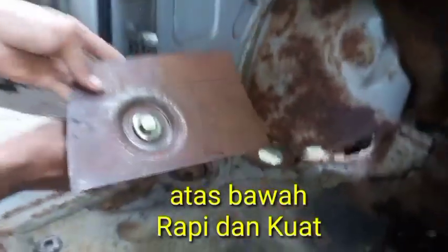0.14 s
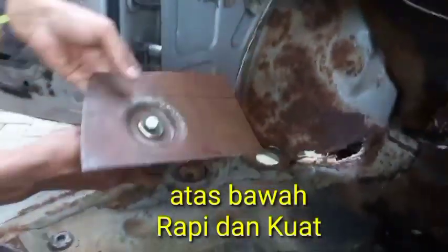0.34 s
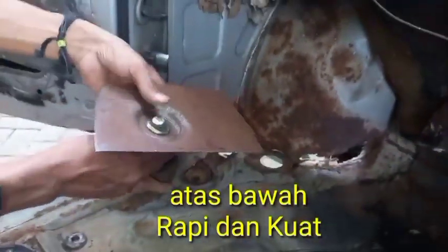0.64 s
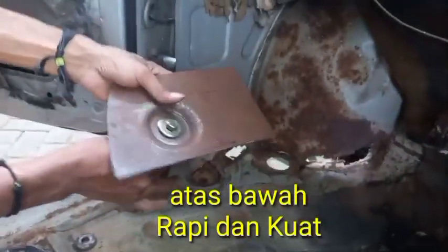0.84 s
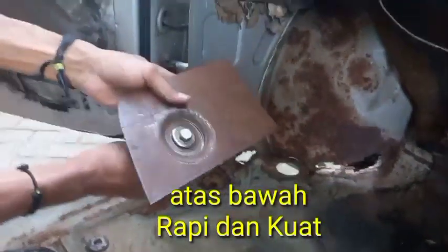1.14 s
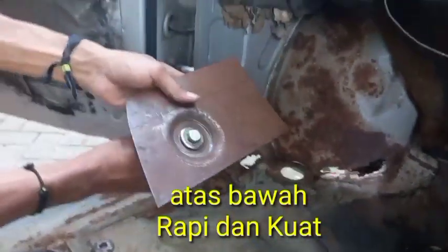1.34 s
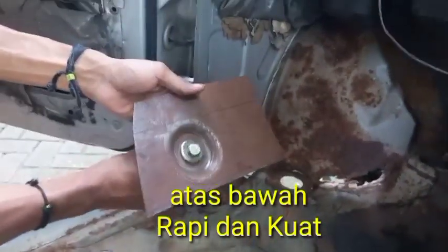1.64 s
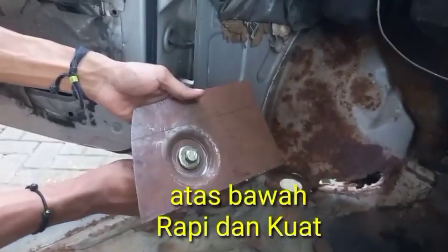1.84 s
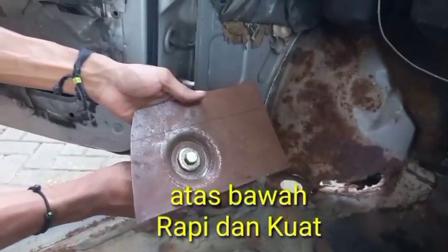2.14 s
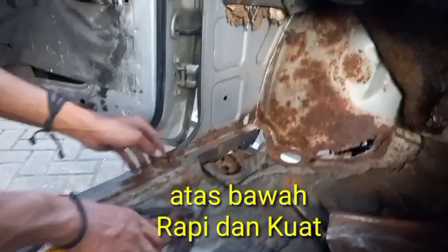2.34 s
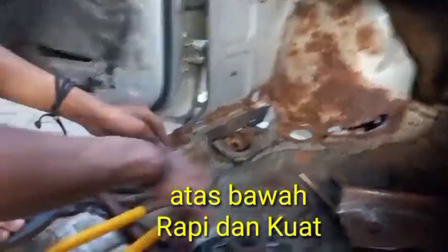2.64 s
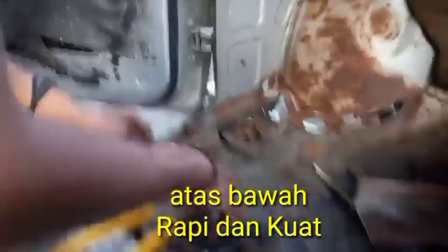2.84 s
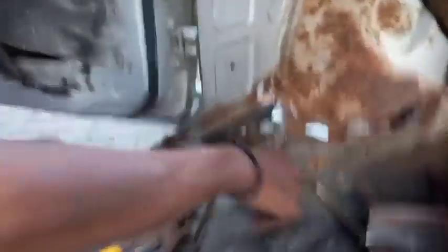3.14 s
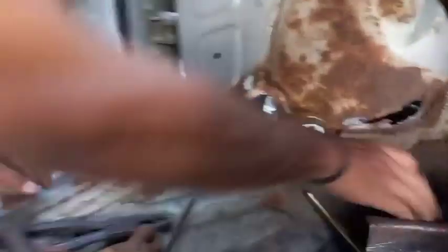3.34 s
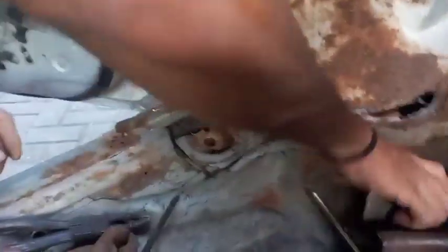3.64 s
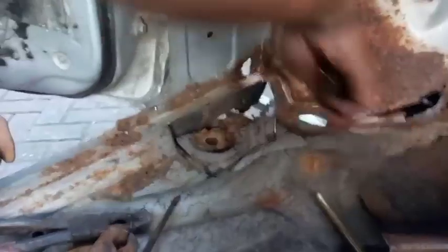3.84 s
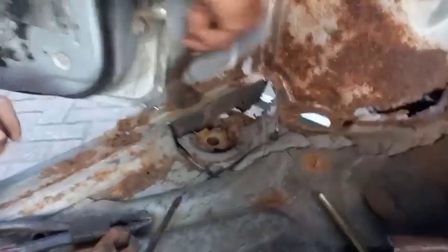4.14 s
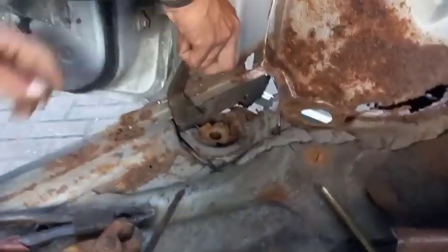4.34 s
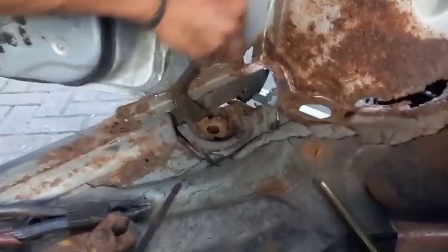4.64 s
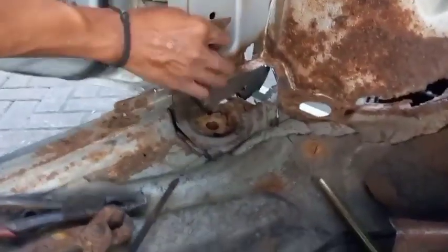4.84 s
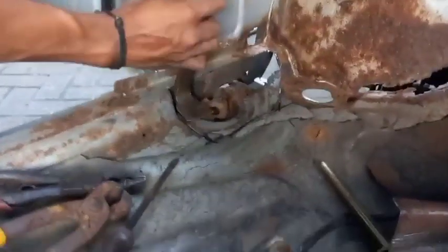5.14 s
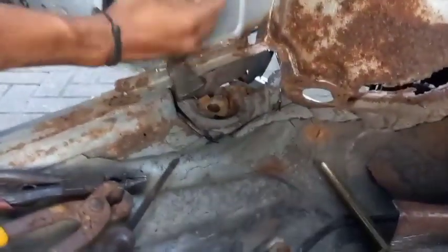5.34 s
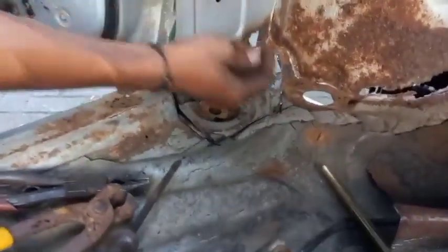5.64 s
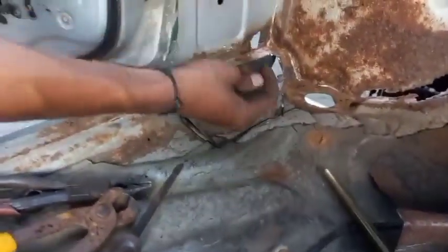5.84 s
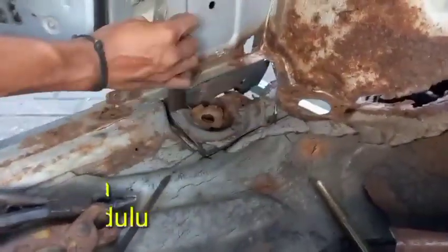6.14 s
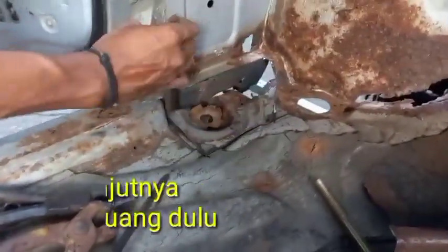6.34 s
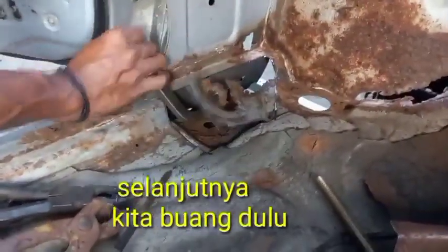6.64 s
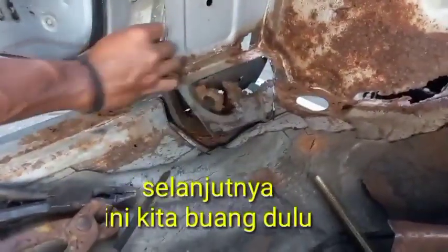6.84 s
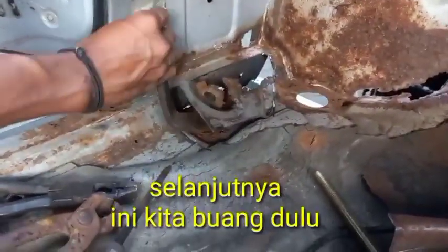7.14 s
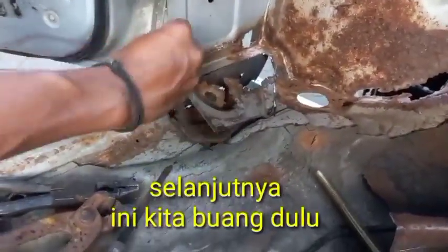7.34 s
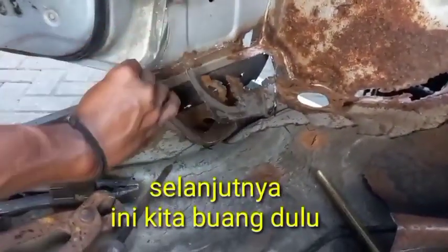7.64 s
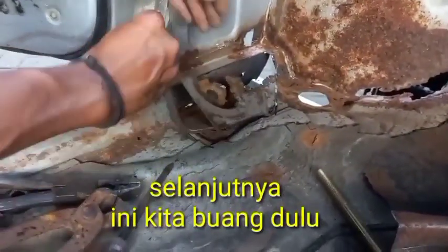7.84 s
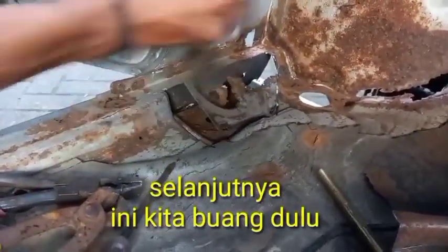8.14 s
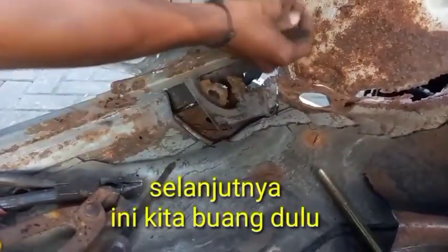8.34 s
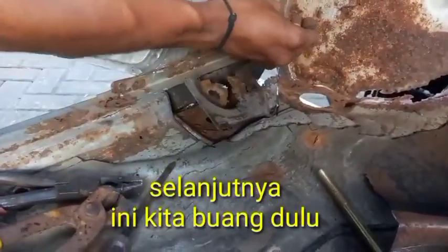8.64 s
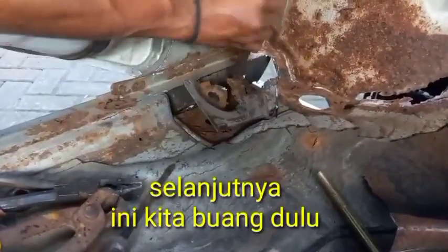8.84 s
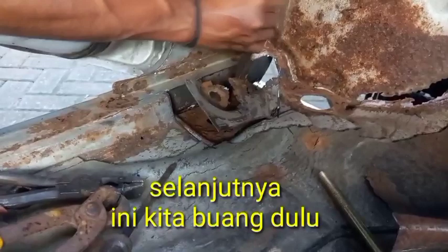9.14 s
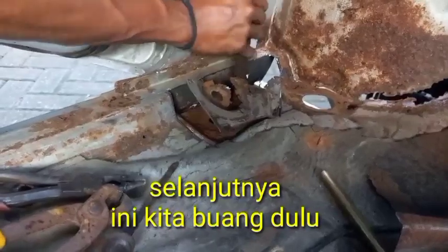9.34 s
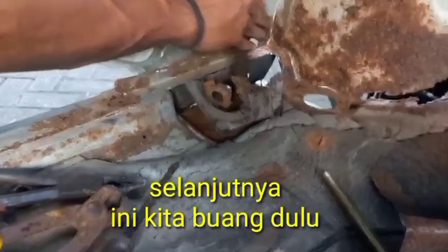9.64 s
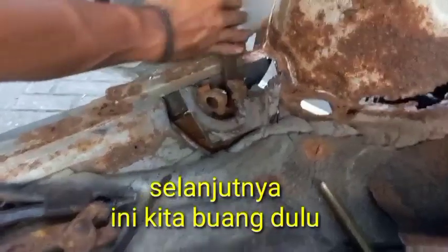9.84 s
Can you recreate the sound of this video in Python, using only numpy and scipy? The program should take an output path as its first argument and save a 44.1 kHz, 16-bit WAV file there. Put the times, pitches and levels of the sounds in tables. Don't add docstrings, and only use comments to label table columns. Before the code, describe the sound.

A steel tool knocks, scrapes and pries at a rusted car floor in irregular hollow clanks, after faint finger taps on a small metal plate.

```python
import sys
import numpy as np
from scipy import signal
from scipy.fft import rfft, irfft, next_fast_len
from scipy.io import wavfile
from scipy.ndimage import uniform_filter1d, map_coordinates

SR = 44100
rng = np.random.default_rng(int(sys.argv[2]) if len(sys.argv) > 2 else 0)


def generate_wav(signal):
    frames = np.transpose(np.atleast_2d(signal))
    scaled = np.clip(frames, -1, 1) * 32767
    pcm = np.round(scaled).astype(np.int16)
    wavfile.write(sys.argv[1], SR, pcm)


def level_to_linear(level):
    exponent = np.asarray(level, float) / 20
    return 10 ** exponent


N = 441000

# (time [s], rumble level [dB])
TRAFFIC = [
    (0, -68),
    (.45, -74),
    (1.1, -71.5),
    (1.6, -70.5),
    (2.39, -71.5),
    (2.49, -63),
    (5.3, -65.5),
    (7.2, -64),
    (8.4, -68),
    (10, -59.5),
]
# (frequency [Hz], density [dB per Hz])
RUMBLE_SPECTRUM = [(12, -69.5), (32, -29), (51, -7.5), (76, -3.5), (100, -3), (130, -18), (200, -26),
                   (440, -120)]
# (frequency [Hz], density [dB per Hz])
DRONE_SPECTRUM = [(76, -30.5), (130, -9), (260, -2), (380, -5), (560, -11), (900, -14.5), (2500, -34.5),
                  (3300, -79.5), (5500, -120)]
DRONE_DB, DRONE_SHARE = -81.5, 0.26
SHUDDER_DB, SHUDDER_S, SHUDDER_DRONE_DB = -11, 0.17, -20
# (frequency [Hz], density [dB per Hz])
HISS_SPECTRUM = [(710, -40), (1200, -6), (2000, -8), (6500, -11), (7800, -3), (9200, -10), (14500, -9),
                 (16000, -17)]
HISS_DB = -91

# (start [s], length [s],
# frequency [Hz], level [dB])
SINGING_MODES = [(0, 0.2, 535, -71), (0, 0.09, 1070, -87), (.89, 0.088, 94, -63.5),
                 (1.107, 0.14, 101.5, -59), (5.31, 0.12, 226, -66), (5.308, 0.12, 457, -71),
                 (1.463, 0.23, 7750, -84), (1.553, 1, 550, -91), (2.528, 0.21, 68, -46),
                 (2.662, 0.3, 68, -55), (2.6, 0.087, 2680, -88), (2.728, .058, 2660, -83),
                 (3.25, 0.2, 3440, -80), (7.046, 0.05, 3500, -80), (7.459, 0.094, 225, -37.5),
                 (7.66, 0.23, 1480, -80), (8.227, 0.16, 1457, -80), (8.296, 0.19, 2690, -84.5),
                 (8.284, 0.18, 1116, -88), (8.621, .2, 231, -31), (9.19, 0.13, 1490, -66),
                 (9.401, 0.098, 1450, -74), (8.835, .045, 1470, -63), (7.95, .15, 1480, -80),
                 (8.9, 0.053, 1950, -58), (6.05, .07, 990, -60), (9.656, 0.061, 1400, -68),
                 (9.911, .03, 700, -25), (5.83, .025, 1200, -33), (4.705, .06, 750, -56),
                 (4.585, .03, 1250, -72), (8.461, .04, 760, -29), (5.13, .07, 640, -55)]
MODE_WIDTH_HZ, MODE_LOSS = 5.8, 0.013
# (start [s], length [s], frequency [Hz], width [Hz], level [dB])
BRUSHES = [
    (0, .12, 563, 334, -70.5),
    (0.518, 0.14, 7140, 2510, -83),
    (1.505, 0.16, 10200, 7900, -82),
    (3.021, 0.18, 2670, 282, -88.5),
    (3.223, 0.23, 1340, 122, -81),
    (4.849, 0.39, 1420, 152, -80),
]

# (time [s], peak level [dB], low level [dB], click level [dB])
FINGER_TAPS = [(.248, -73, -2, 2), (.719, -69.5, -10, -12), (.803, -56, -10, -25), (.825, -52, -11, -24),
               (.843, -46, -28, -30), (.873, -44, -23, -32), (.901, -51.5, -25, -18),
               (1.02, -60, -1.5, -25), (1.079, -48, -12, -13), (1.109, -55.5, -10, -18),
               (1.159, -64, -22, 12.5), (1.17, -72, -5, 4), (1.095, -58, -10, -12), (1.328, -73, -11, -18),
               (1.389, -69, -9, -15), (1.483, -59, -29, -25)]
# (frequency [Hz], width [Hz], level [dB])
PLATE_MODES = [(868, 54, -2.5), (1240, 73, -2.5), (1780, 130, -6), (2490, 35, -16), (2480, 17, -11)]
RUB_T60 = 0.08

# (time [s], lag of the left port [samples])
PORT_LAG = [(0, -5), (2.2, -5), (2.7, -14), (3.1, 9), (4.4, 10), (4.7, -5), (5.2, -9), (6.2, -6), (6.7, 20),
            (7.1, -5), (8.3, -4), (8.7, 15), (9.1, -4), (10, -6)]
# (time [s], left over right [dB])
PORT_BALANCE = [(2.49, 1), (3.03, 0), (3.7, -2.5), (4.16, -1), (4.54, -2.5), (5.33, -1), (5.83, -2.5),
                (6.15, -0.5), (6.7, -2), (7.3, 0.5), (7.9, -1.5), (8.46, -4), (8.62, -1), (9.5, -1),
                (10, -3)]
# (start [s], end [s])
SILENCE = (2.388, 2.487)

# (frequency [Hz], width [Hz], level [dB])
BOOM_MODES = [(68, 7.6, -15), (117, 9.8, -11.5), (155, 17, -5.5), (204.2, 20.6, -2.5), (231, 13.6, 0),
              (280.3, 27, -4.5)]
# (frequency [Hz], width [Hz], level [dB])
PANEL_MODES = [(347, 41.6, 1), (401.4, 34.7, 2), (467.3, 45.3, 3), (542.4, 43.8, 0), (642, 41, -4),
               (684, 60, -3), (817.5, 85, -6.5), (978.6, 62.4, -5), (1187, 130, -11)]
# (frequency [Hz], width [Hz], level [dB])
CLANK_MODES = [(1388, 162, 4), (1503, 84, 3.5), (1596, 75, 0), (1806, 110, 0), (1962, 210, -2.5),
               (2415, 45, -3), (2402, 92, -9), (2820, 200, -13.5), (2850, 90, -14), (3870, 470, -25.5)]
# (frequency [Hz], width [Hz], level [dB])
THUD_MODES = [(222, 114, -4), (399, 241, 0.5), (720, 352, -6.5)]
# (frequency [Hz], density [dB per Hz])
GRIT_SPECTRUM = [(1470, -28), (2500, -8.5), (4730, -7), (6650, -10), (8080, -6.5), (10400, -10),
                 (14800, -11.5), (15900, -50)]

# (time [s], peak level [dB], boom level [dB], grit level [dB], bright level [dB])
PRESSED_BLOWS = [(2.534, -19, -14, -20, -1.5), (2.548, -16, -12, -41, -2),
                 (2.707, -22.5, -8.5, -40.5, -2.5), (2.865, -40, -11, -42.5, 4),
                 (2.885, -37, -26.5, -28.5, 3.5), (3.568, -48.5, 3, -21, -0.5),
                 (5.131, -40, -27, -13, -0.5), (6.454, -36, -13.5, -20.5, 1), (8.968, -32.5, 2, -20, -2.5),
                 (3.711, -26, -27, -15, -3.5), (3.747, -33, -2.5, -39, -8), (4.229, -23.5, -11.5, -50, -5),
                 (4.261, -23.5, -12, -45, -2.5), (4.361, -18, -9, -23.5, -1),
                 (4.749, -42.5, -37, -6.5, 0.5), (5.29, -56, -12, -20, 1.5), (5.422, -19.5, -14, -55, -6),
                 (5.832, -19, -20, -33, 11), (6.126, -23.5, -10.5, -6, 5), (6.653, -28, 2, -9, -1.5),
                 (6.704, -22, -20, -20, 1), (6.735, -26.5, -9.5, -11, -1), (6.875, -16.5, -13.5, -30, 1),
                 (7.331, -23, -4, -36, -3), (7.484, -20, -8, -21, 0.5), (7.642, -36, -2.5, -42, -3),
                 (7.873, -29, -11, -24, 6), (8.548, -29, -16.5, -3, -2.5), (9.742, -42, 2, -30, -3),
                 (9.913, -9, -11, -20, 0), (5.952, -37.5, -14.5, -25, -1), (6.629, -33.5, -9.5, -9.5, 1.5),
                 (6.857, -37, -12, -15, 5), (8.889, -33, -3.5, -14, 0.5), (8.907, -30.5, -7, -14, 5),
                 (9.9, -28, -2, -40, -5), (9.358, -46, -4, -14.5, 0), (8.629, -18, -10.5, -34, 0.5),
                 (8.502, -20.5, -18.5, -31, -3)]
# (time [s], peak level [dB], boom level [dB], grit level [dB], bright level [dB])
FREE_BLOWS = [(2.506, -41.5, -2, -39.5, -2.5), (2.69, -46, -8, -39.5, 5), (3.23, -49.5, -6.5, -58, -5.5),
              (3.465, -39, -11.5, -13, 4.5), (3.625, -36.5, -1, -31, -0.5), (3.693, -18, -10, -35, -8),
              (4.318, -29, -4, -38, -1.5), (4.634, -41, -10, -45, -5), (4.71, -45, -40, -22, 6),
              (4.891, -50, -12, -45, -6), (5.003, -38, -35, -7, 1.5), (5.628, -46, -2, -30, -3),
              (5.708, -43.5, -16.5, -13.5, 2.5), (5.789, -33, -29.5, -18.5, 3.5), (5.824, -24, -27, -28, 4),
              (5.97, -27, -15, -27, 6), (6.548, -27, -10, -32, -1.5), (6.591, -26, -7.5, -14, -3),
              (6.819, -35, -4.5, -30, 0), (7.036, -63, 10, -5, 0), (7.453, -21, -6.5, -9, 1),
              (8.462, -8, -30.5, -23.5, -1.5), (8.621, -19, -9.5, -9.5, -3.5), (8.829, -31, -7.5, -15.5, 3),
              (9.242, -48.5, 8.5, -21.5, -3.5), (9.549, -73, 16, -31.5, -6), (9.887, -32.5, 1, -31.5, -1)]
PRESSED_T60, FREE_T60 = 0.22, 0.39
BLOW_CLANK_DB, BLOW_CLANK_SHARE = -8, 0.24
BRIGHT_CLANK_SHARE = 0.7
THUD_DB, REBOUND_S, REBOUND_DB = 13, 0.004996, -4.5
GRIND_LEAD, GRIND_S, GRIND_DB, GRIND_GRIT_DB = 0.0068, 0.024, -18.5, 4.5

# (start [s], length [s], panel level [dB], grit level [dB], bright level [dB])
EDGE_DRAGS = [(2.852, 0.095, -62.5, -3, 0), (3.225, .08, -66, -25, 0), (5.285, .07, -62, -14, 0),
              (5.14, .06, -50, -15, 3), (7.99, .12, -60, -22, -1.5), (3.43, 0.11, -57.5, -5.5, -0.5),
              (3.528, 0.11, -59, -19, -1), (3.639, 0.04, -46, -12.5, 1), (3.765, 0.14, -62.5, -12, -7.5),
              (3.886, .16, -59.5, -12, 1.5), (4.226, 0.19, -46, -28, -4), (4.626, 0.11, -60, -13, 2),
              (4.72, 0.05, -51, -3, 3), (4.971, 0.21, -49.5, -15.5, 3.5), (5.446, 0.087, -47.5, -19, 1.5),
              (5.672, 0.1, -58, -15, 2.5), (5.789, .03, -43, -17.5, 5.5), (5.881, 0.21, -57.5, -12.5, 0.5),
              (6.043, .08, -49, -5.5, 5.5), (6.315, 0.172, -60.5, -10.5, 2),
              (6.499, 0.031, -40.5, -12.5, 0), (6.551, 0.08, -33.5, -16, -1.5),
              (6.704, 0.037, -43, -11.5, 0), (6.818, 0.04, -37.5, -16.5, 0.5),
              (7.347, 0.078, -48, -27.5, -0.5), (7.448, 0.068, -32, -21, 0.5),
              (7.518, 0.15, -48, -15.5, -5), (7.783, .071, -50.5, -23.5, -3),
              (7.862, 0.056, -26, -16.5, -1.5), (8.463, 0.13, -35, -28.5, 1), (8.688, 0.046, -47.5, -6, 1),
              (8.838, 0.056, -42, -17, -1), (8.89, 0.083, -37.5, -4.5, -2), (9.041, 0.1, -48, -2, -3),
              (9.161, 0.12, -62.5, -5, -5), (9.244, 0.06, -55, -10, -3.5), (9.301, 0.14, -61, -8, -6),
              (9.657, 0.17, -62, -7, -4.5), (9.863, .04, -47.5, -25, 2), (9.927, .067, -44, -21.5, 0)]
DRAG_CLANK_DB, DRAG_CLANK_SHARE = -3.5, 0.64
DRAG_BOOM_DB, DRAG_BOOM_SHARE = -9, -0.27
EDGE_DB, EDGE_SHARE, PANEL_SHARE = 0.5, 0.48, -0.26
SLIPS_PER_S, SLIP_DB, SLIP_SPREAD_DB = 57, 18.5, 4
# (time [s], grit peak level [dB], clank level [dB])
RUST_SNAPS = [(3.535, -42, -8), (3.572, -52, 8), (4.365, -49, 9.5), (4.752, -45, 14), (5.836, -34, 16),
              (6.129, -22, -4), (6.312, -68, -9), (6.375, -38, -13.5), (6.425, -39, -10), (6.654, -12, -29),
              (6.706, -30, -8), (4.262, -40, 8), (6.661, -22, -20), (6.85, -36, -5), (6.737, -20, -12),
              (9.132, -38, -7), (9.915, -18.5, 3.5), (8.4612, -27.5, 2.5), (8.91, -26, -0.5),
              (9.056, -36, -4), (9.2633, -33, -10), (9.358, -39, 0), (9.657, -50.5, -9)]


def unit(x):
    return x / np.sqrt(np.mean(x ** 2) + 1e-20)


def curves(rows):
    s, *cols = np.transpose(rows)
    return [np.interp(np.arange(N) / SR, s, c) for c in cols]


def wobble(rate):
    knots = rng.standard_normal(int(N * rate / SR) + 2)
    return np.interp(np.arange(N) * rate / SR, np.arange(len(knots)), knots)


def lag(x, seconds):
    k = 1 / (seconds * SR)
    return signal.lfilter([k], [1, k - 1], x)


def coloured(x, response):
    m = next_fast_len(N + SR // 2)
    h = response(np.fft.rfftfreq(m, 1 / SR))
    h = h / np.sqrt(np.mean(np.abs(h) ** 2))
    return irfft(rfft(x, m) * h, m)[..., :N]


def spectrum(points):
    f, db = np.transpose(points)
    return lambda hz: level_to_linear(np.interp(np.log(hz + 1), np.log(f + 1), db))


def resonances(modes):
    def response(f):
        total = 0
        for k, (centre, width, db) in enumerate(modes):
            loss = 1j * f * width
            total = total + (-1) ** k * level_to_linear(db) * loss / (centre * centre - f * f + loss + 1e-9)
        return total
    return response


def street(metal):
    def pair(turn):
        mix = np.array([[np.cos(turn), np.sin(turn)], [np.cos(turn), -np.sin(turn)]])
        return mix @ rng.standard_normal((2, N))

    traffic_db, = curves(TRAFFIC)
    pan_motion = lag(lag(metal.mean(axis=0), 0.00089), 0.00089)
    shudder = level_to_linear(SHUDDER_DB) * np.sqrt(lag(pan_motion ** 2, SHUDDER_S / 2))
    far = level_to_linear(DRONE_DB + DRONE_SHARE * (traffic_db - traffic_db.mean()))
    rumble_level = np.hypot(level_to_linear(traffic_db), shudder) * level_to_linear(2.5 + 4.4 * wobble(9.4))
    drone_level = np.hypot(far, level_to_linear(SHUDDER_DRONE_DB) * shudder) * level_to_linear(2.5 * wobble(17))
    hiss_level = level_to_linear(HISS_DB + 6 + 1.3 * wobble(1.6))
    rumble = rumble_level * coloured(pair(turn=0.15), spectrum(RUMBLE_SPECTRUM))
    drone = drone_level * coloured(pair(turn=0.61), spectrum(DRONE_SPECTRUM))
    hiss = hiss_level * coloured(rng.standard_normal((2, N)), spectrum(HISS_SPECTRUM))
    return rumble + drone + hiss


def singing():
    out = np.zeros((2, N + SR))
    modes = [(s, length, hz, MODE_WIDTH_HZ + MODE_LOSS * hz, db) for s, length, hz, db in SINGING_MODES]
    for s, length, hz, width, db in modes + BRUSHES:
        t = np.arange(round(length * SR)) / SR
        knots = rng.standard_normal((4, 4000))
        a, b, c, d = (map_coordinates(k, [t * width]) for k in knots)
        steady = 10 / width
        wide = min(hz / 900, 1)
        shared = steady + a + 1j * b
        pair = np.real(np.array([shared, shared + wide * (c + 1j * d)]) * np.exp(2j * np.pi * hz * t))
        swell = np.abs(np.sin(np.pi * (t / length) ** 0.54)) ** 1.2
        out[:, round(s * SR):][:, :len(t)] += level_to_linear(db) * swell * pair
    return out[:, :N]


def cabin(x):
    out, step = np.zeros((2, N + SR)), SR // 2
    for at in range(0, N, step):
        hz, t, z = signal.stft(rng.standard_normal((2, SR // 2)), SR, nperseg=256)
        t60 = np.interp(np.log(hz + 1), np.log([200, 1500, 10000]), [0.45, 0.3, 0.1])
        wide = np.clip(hz / 900, 0, 1)[:, None] ** 3.9
        z = np.array([z[0] + wide * z[1], z[0] - wide * z[1]])
        tail = signal.istft(z * level_to_linear(-60 * t / t60[:, None]), SR, nperseg=256)[1]
        tail = tail / np.sqrt(np.sum(tail[0] ** 2))
        answer = signal.fftconvolve(x[:, at:at + step], tail, axes=1)
        out[:, at:at + answer.shape[1]] += answer
    return out[:, :N]


def bursts(times, levels_db, t60s, attack, shock_db):
    power, t = np.zeros(N + SR), np.arange(SR // 4) / SR
    for s, db, t60 in zip(times, levels_db, t60s):
        rattle = level_to_linear(2 * (db - 60 * t / np.clip(t60, 0.01, 0.2)))
        shock = level_to_linear(2 * (db + shock_db - 60 * t / 0.0065))
        power[round((s - 0.002) * SR):][:len(t)] += (rattle + shock) * (1 - np.exp(-t / attack)) ** 2
    return np.sqrt(power[:N])


def delayed(force):
    late = np.clip(np.arange(N) - np.round(curves(PORT_LAG)[0]).astype(int), 0, N - 1)
    return np.array([force[late], force])


def ports(env, noise, alike, lumpy_db, rate, kick=0):
    shared, left, right = env * unit(level_to_linear(lumpy_db * wobble(rate)) * noise)
    return delayed(np.sqrt(alike) * shared + kick) + np.sqrt(1 - alike) * np.array([left, right])


def plate():
    s, db, low_db, click_db = np.transpose(FINGER_TAPS)
    t60 = np.full(len(FINGER_TAPS), RUB_T60)
    skin = rng.standard_normal((3, N))
    ring = bursts(s, db - 3.5, t60, attack=0.0018, shock_db=-9)
    low = bursts(s, db + low_db + 3.5, t60, attack=0.0042, shock_db=-9)
    click = bursts(s, db + click_db + 2, 0.4 * t60, attack=0.0003, shock_db=7.5)
    ring = ports(ring, skin, alike=0.62, lumpy_db=5.5, rate=150)
    low = ports(low, skin, alike=1.0, lumpy_db=8.5, rate=190)
    click = ports(click, skin, alike=0.72, lumpy_db=2.5, rate=300)
    dull = resonances([(430, 61, -0.45), (568, 38, -0.54)])
    return coloured(ring, resonances(PLATE_MODES)) + coloured(low, dull) + coloured(click, spectrum(GRIT_SPECTRUM))


def strokes(spans, levels_db, rise, fall):
    env = np.zeros(N)
    for (s, length), db in zip(spans, levels_db):
        span = slice(round(s * SR), round((s + length) * SR))
        env[span] = np.maximum(env[span], level_to_linear(db))
    return np.maximum(lag(env, rise), lag(env, fall))


def patchy(patchy_db):
    z = signal.stft(rng.standard_normal((3, N)), nperseg=512)[2]
    field = uniform_filter1d(rng.standard_normal(z.shape[1:]), size=3, axis=0)
    field = uniform_filter1d(field, size=9, axis=1)
    return signal.istft(z * level_to_linear(patchy_db * unit(field)), nperseg=512)[1][:, :N]


def kicks(times, levels_db):
    out = np.zeros(N)
    out[np.round((times + 0.0005) * SR).astype(int)] = level_to_linear(levels_db)
    return lag(lag(out, 0.00004), 0.00004)


def thud(s, db):
    push = sum(kicks(s + k * REBOUND_S, db + THUD_DB + k * REBOUND_DB) * (-1) ** k for k in range(3))
    return coloured(delayed(push), resonances(THUD_MODES))


def snaps():
    s, db, clank_db = np.transpose(RUST_SNAPS)
    brief = np.full(len(RUST_SNAPS), 0.035)
    grit = bursts(s, db - 11.0, brief, attack=0.0002, shock_db=1.5)
    clank = bursts(s, db + clank_db - 6, brief, attack=0.00019, shock_db=-1.0)
    return grit, clank


def panel():
    blows = PRESSED_BLOWS + FREE_BLOWS
    s, db, boom_db, grit_db, bright_db = np.transpose(blows)
    clank_db = BLOW_CLANK_DB + BLOW_CLANK_SHARE * grit_db + BRIGHT_CLANK_SHARE * bright_db
    t60 = np.repeat([PRESSED_T60, FREE_T60], [len(PRESSED_BLOWS), len(FREE_BLOWS)])

    grinds = [(at - GRIND_LEAD, GRIND_S, peak + GRIND_DB, grit + GRIND_GRIT_DB, bright)
              for at, peak, _, grit, bright in blows]
    drags = np.array(EDGE_DRAGS + grinds)
    spans, (drag_db, drag_grit, drag_bright) = drags[:, :2], drags[:, 2:].T
    drag_boom_db = drag_db + DRAG_BOOM_DB + DRAG_BOOM_SHARE * drag_grit
    drag_panel_db = drag_db + PANEL_SHARE * drag_grit
    drag_clank_db = drag_db + DRAG_CLANK_DB + DRAG_CLANK_SHARE * drag_grit + BRIGHT_CLANK_SHARE * drag_bright
    edge_db = drag_db + EDGE_DB + EDGE_SHARE * drag_grit + drag_bright
    catch = 2.0 * wobble(40)

    def force(hit, level_db):
        drag = strokes(spans, level_db, rise=0.0097, fall=0.0082)
        return np.hypot(hit, level_to_linear(catch + 0.84 * wobble(25)) * drag)

    boom_hit = bursts(s, db + boom_db - 0.5, 0.5 * t60, attack=0.0013, shock_db=5.5)
    body_hit = bursts(s, db - 9, 0.43 * t60, attack=0.00036, shock_db=-0.5)
    ribs_hit = bursts(s, db + bright_db - 13.5, 0.36 * t60, attack=0.00024, shock_db=4.0)
    clank_hit = bursts(s, db + clank_db - 3.5, 0.51 * t60, attack=0.000077, shock_db=8.0)
    grit_hit = bursts(s + 0.0022, db + grit_db - 2.0, 0.23 * t60, attack=0.00013, shock_db=-0.5)
    boom = force(boom_hit, drag_boom_db)
    body = force(body_hit, drag_panel_db - 8.0)
    ribs = force(ribs_hit, drag_panel_db + drag_bright - 12.5)
    snap_grit, snap_clank = snaps()
    clank = np.hypot(force(clank_hit, drag_clank_db - 1.0), snap_clank)
    grit = np.hypot(force(grit_hit, drag_db + drag_grit + 1.5), snap_grit)

    slip = (rng.random(N) < SLIPS_PER_S / SR) * level_to_linear(SLIP_DB + SLIP_SPREAD_DB * rng.standard_normal(N))

    def slips(level_db):
        return slip * strokes(spans, level_db, rise=0.0066, fall=0.0073)

    rust = patchy(patchy_db=3.5)
    boom = ports(boom, rust, alike=0.96, lumpy_db=5.5, rate=120, kick=kicks(s, db + boom_db + 25.5))
    body = ports(body, rust, alike=0.81, lumpy_db=3.0, rate=160, kick=kicks(s, db + 12.0))
    ribs = ports(ribs, rust, alike=0.6, lumpy_db=3.5, rate=170, kick=kicks(s, db + bright_db + 8.5))
    clank = ports(clank, rust, alike=0.19, lumpy_db=2.5, rate=200, kick=kicks(s, db + clank_db + 6.0))
    grit = ports(grit, patchy(patchy_db=4.5), alike=0.3, lumpy_db=4.0, rate=300)
    grit = grit + delayed(slips(drag_db + drag_grit - 12.0))
    edge = force(0, edge_db - 6.0)
    edge = ports(edge, patchy(patchy_db=7.5), alike=0.6, lumpy_db=5.0, rate=120, kick=slips(edge_db))

    upper = thud(s, db)
    upper = upper + coloured(body, resonances(PANEL_MODES[:5]))
    upper = upper + coloured(ribs, resonances(PANEL_MODES[5:]))
    upper = upper + coloured(edge, resonances(PANEL_MODES[4:]))
    upper = upper + coloured(clank, resonances(CLANK_MODES))
    upper = upper + coloured(grit, spectrum(GRIT_SPECTRUM))
    balance_db, = curves(PORT_BALANCE)
    side = level_to_linear(np.array([balance_db, -balance_db]) / 2)
    return coloured(boom, resonances(BOOM_MODES)) + side * upper


def scene():
    metal = panel() + plate()
    return metal + level_to_linear(-12.5) * cabin(metal) + singing() + street(metal)


def roll_off(x):
    return signal.sosfilt(signal.butter(12, 16510, fs=SR, output="sos"), x)


def record(dry):
    t = np.arange(N) / SR
    fade_out = (SILENCE[0] - t) / 0.004
    fade_in = (t - SILENCE[1]) / 0.015
    running = np.clip(np.maximum(fade_out, fade_in), 1e-4, 1)
    return roll_off(dry * running)


dry = scene()
out = record(dry)
generate_wav(out)
```